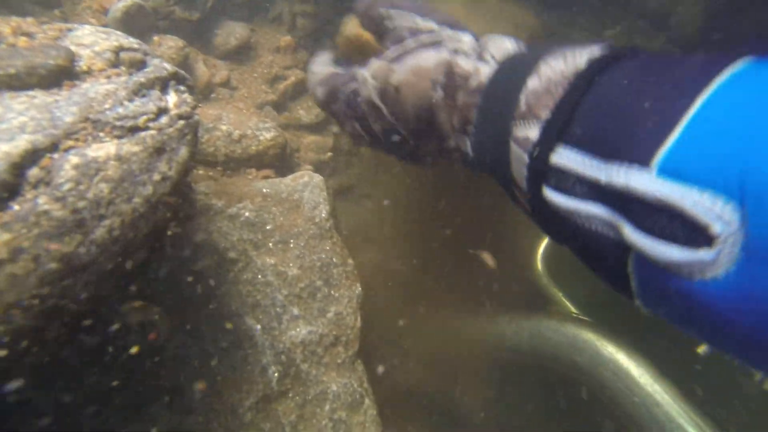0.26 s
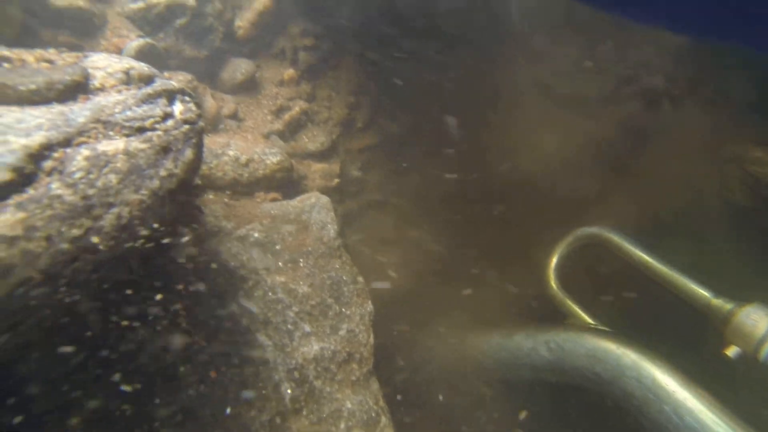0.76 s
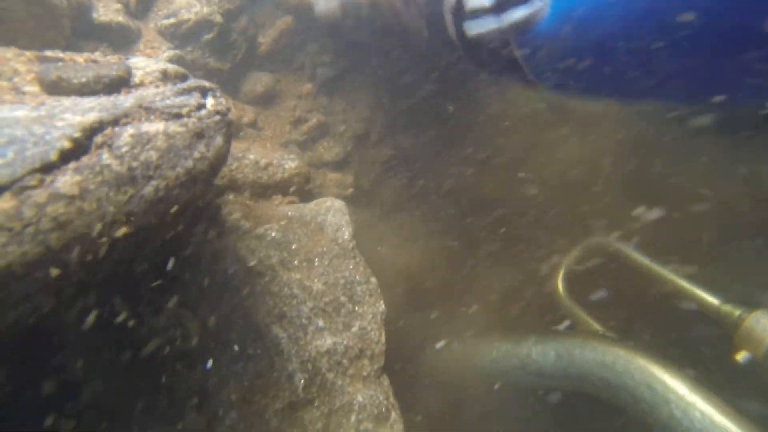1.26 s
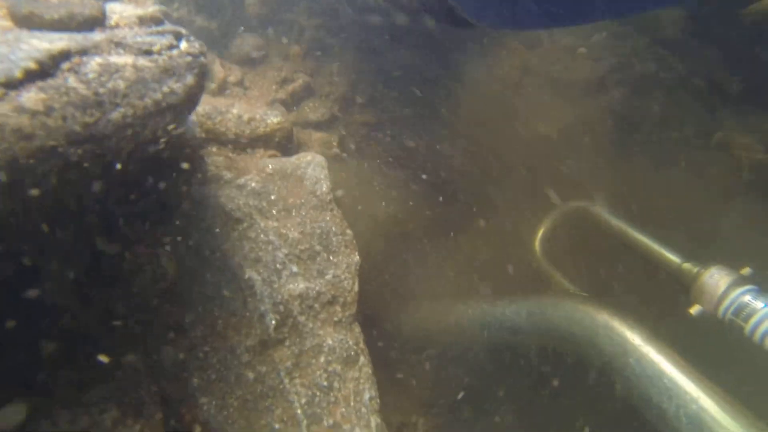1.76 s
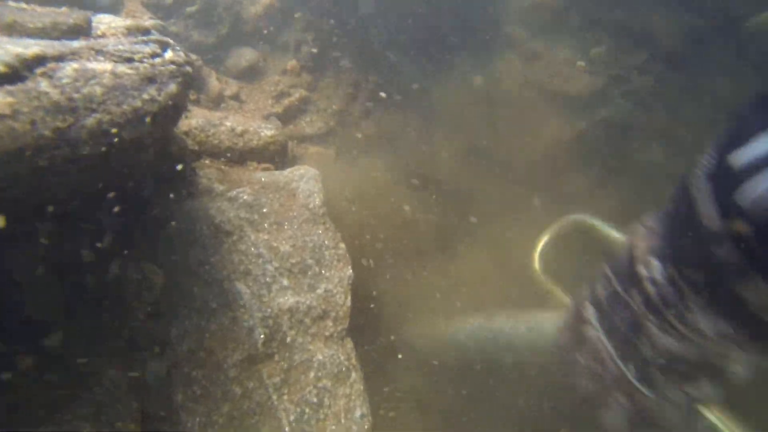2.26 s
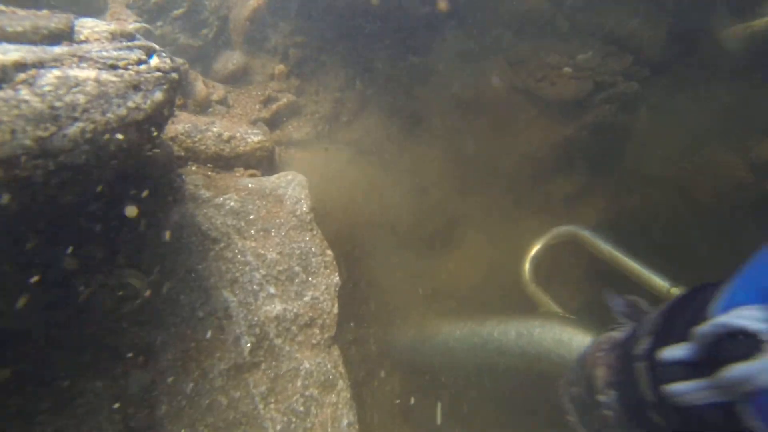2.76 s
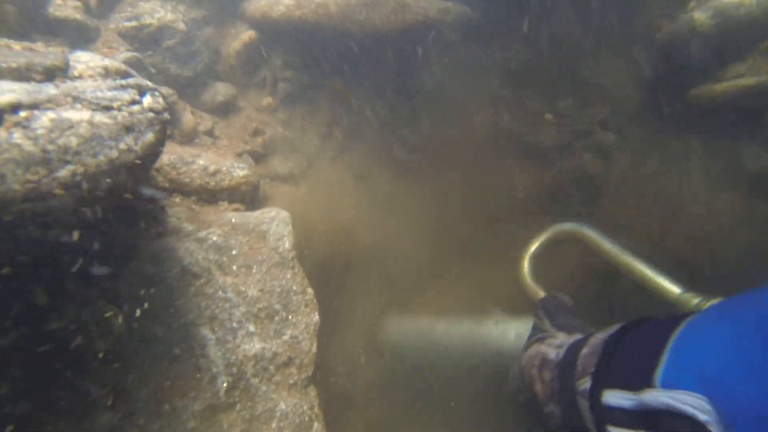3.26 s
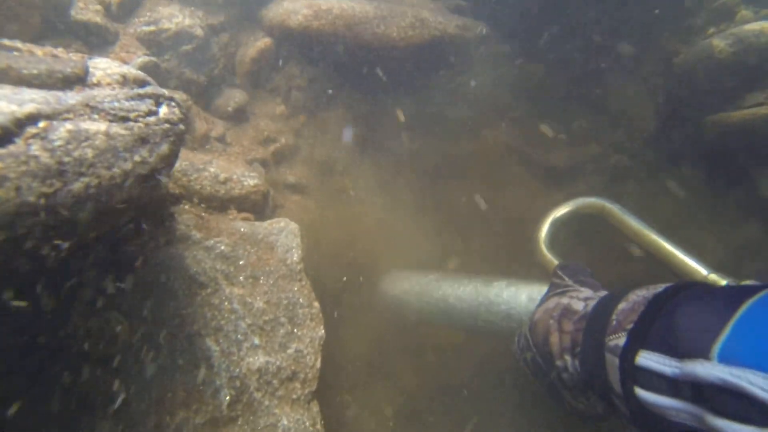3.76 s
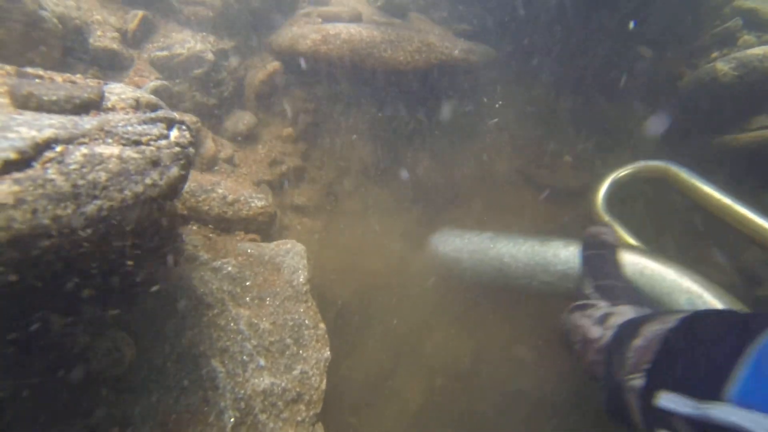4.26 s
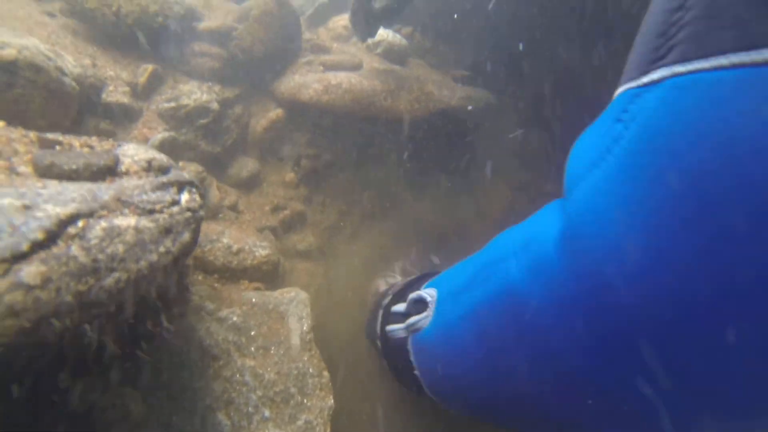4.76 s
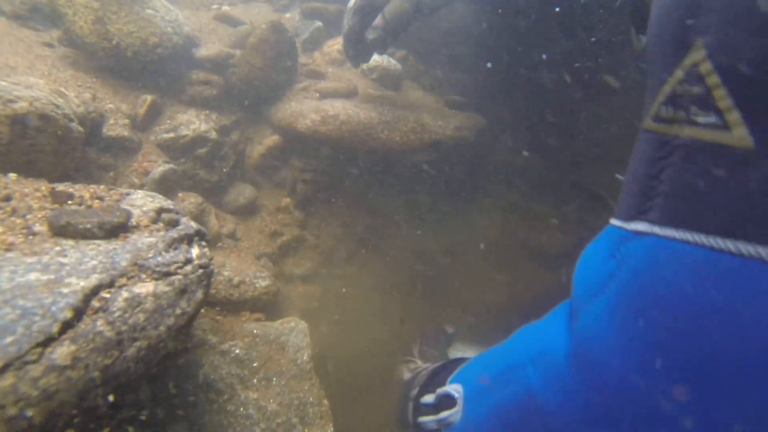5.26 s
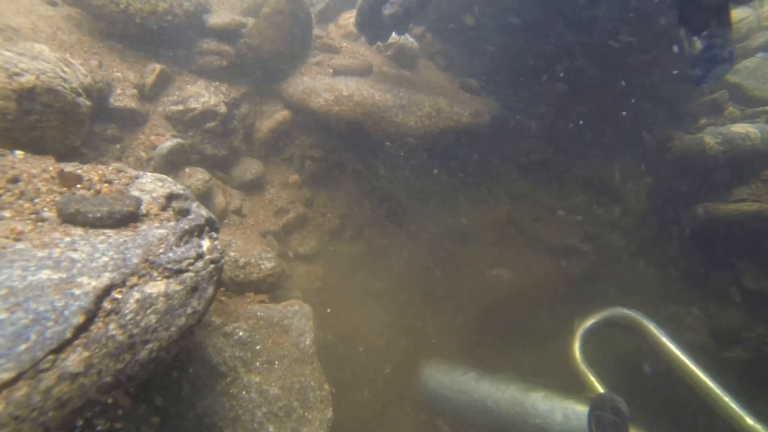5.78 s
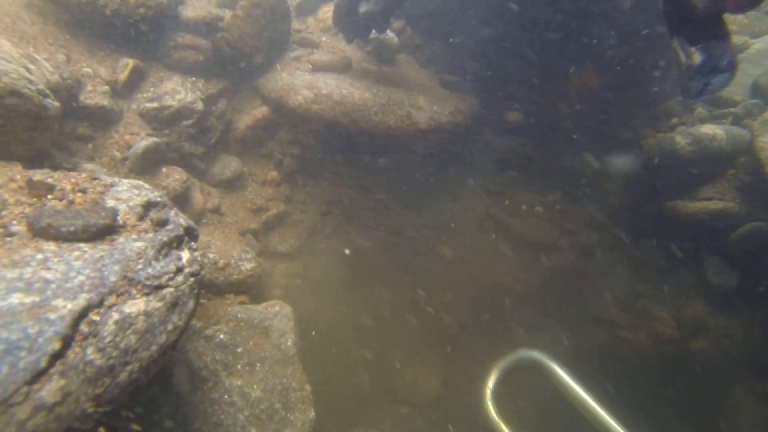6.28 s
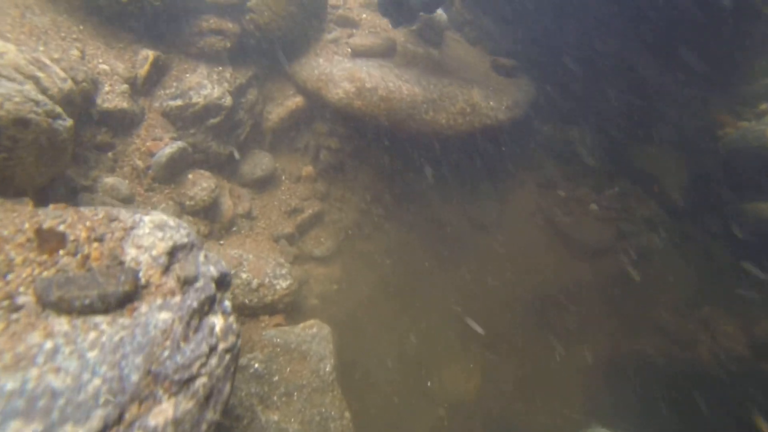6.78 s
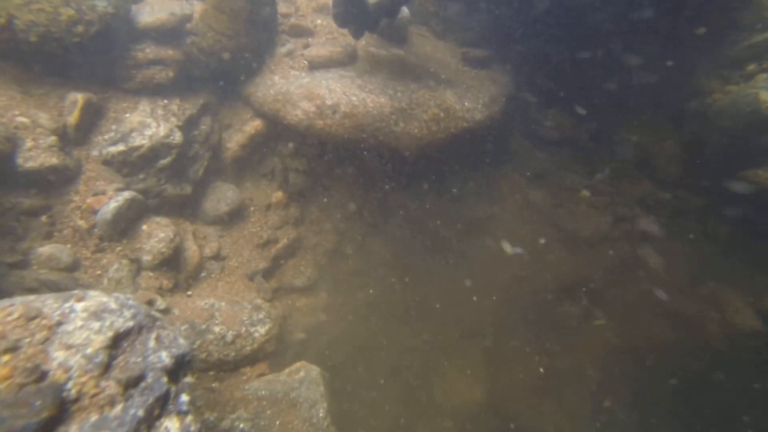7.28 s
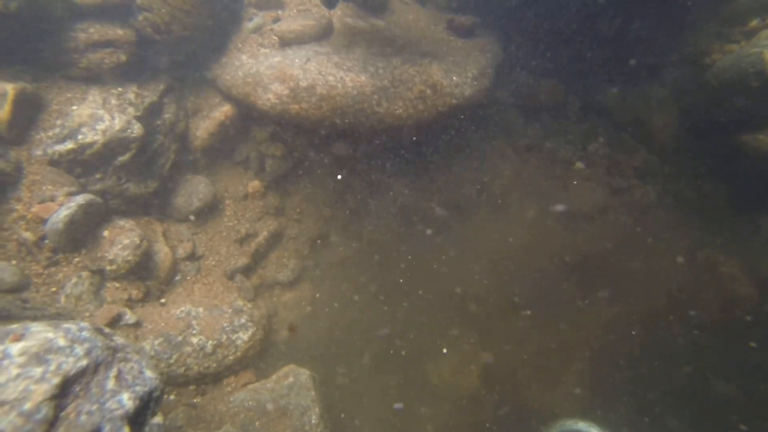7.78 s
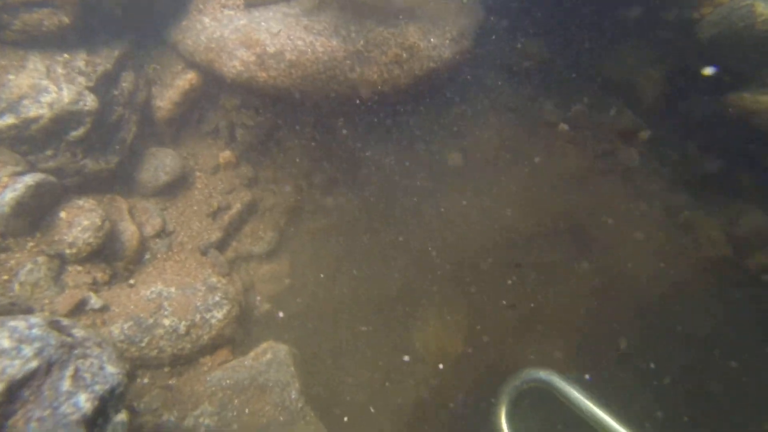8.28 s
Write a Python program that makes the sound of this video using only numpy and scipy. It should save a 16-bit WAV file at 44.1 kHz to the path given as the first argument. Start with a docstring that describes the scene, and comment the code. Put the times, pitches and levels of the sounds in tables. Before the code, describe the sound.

A suction dredge works on a creek bed, heard through a camera housing under water. Stones snap and clack up the steel nozzle in a busy start, thin out, then return as frequent knocks through the middle. After a stuttering rubber rub the stone hits pause, leaving hissing gravel and beating motor hum, before a last handful of sharp cracks. Low water buffets throughout.

```python
"""Creek bed, heard by a camera under water beside a suction dredge.
Gravel rushes up the nozzle as dense random impacts through its resonances; sand, pebbles and stones stand out.
Plinks and knocks are short rings, the glove a train of slips, pump and engine sums of harmonics.
Filtered noise makes the water. Gain control ducks after hard hits, then recovers.
"""
import sys
import numpy as np
from scipy import signal
from scipy.fft import rfft, irfft
from scipy.io import wavfile
from scipy.ndimage import uniform_filter1d, minimum_filter1d, map_coordinates

SR = 44100
rng = np.random.default_rng(int(sys.argv[2]) if len(sys.argv) > 2 else 0)


def materialize(psi):
    """Save the field psi as 16-bit PCM at rate SR to the path in sys.argv[1].

    A 1-D psi becomes a single channel; in a 2-D psi each row is a channel.
    """
    bounded = np.clip(np.atleast_2d(psi).T, -1, 1)
    quanta = np.round(bounded * 32767).astype(np.int16)
    wavfile.write(sys.argv[1], SR, quanta)


N = 376173

# Peaks and notches of the camera housing: (centre [Hz], full width at half the dB gain [Hz], gain [dB])
HOUSING_BELLS = [(570, 110, 7.5), (940, 49, 9.5), (1574, 310, 9), (1900, 96, -5.5), (2204, 100, 3.5),
                 (2328, 130, -8.5), (2785, 165, -8), (3020, 116, -5), (3334, 136, 9), (3772, 240, -16),
                 (4400, 630, 3.5), (4970, 103, -15), (5295, 340, 4.5), (7270, 230, 5), (7920, 1300, -4),
                 (9360, 170, 7), (9735, 630, -9.5)]
# Nozzle resonances by position: (start [s], [(centre [Hz], full width at half the dB gain [Hz], gain [dB])])
NOZZLE_POSES = [(0, [(880, 260, 7), (1540, 360, 4.5), (3360, 220, -2), (10900, 11000, 6)]),
                (2.2, [(1500, 1700, 4.5), (2725, 220, 6.5), (3250, 250, -8), (5530, 1500, 2.5),
                (11700, 3100, 4.5)]), (3.2, [(1030, 570, 4.5), (2210, 220, 4), (3420, 170, -9),
                (4420, 260, 5.5), (12000, 3200, -4)]), (4.35, [(570, 47, 9.5), (895, 160, -4),
                (1410, 280, 9.5), (2610, 600, -11), (3220, 330, 1), (4100, 600, 1.5), (5000, 280, -7),
                (5430, 230, 4), (5730, 400, -9), (6500, 560, 2), (8600, 1000, 4.5)]), (4.98, [(570, 47, 5),
                (910, 190, -5.5), (1470, 300, 7), (2660, 580, -11), (3300, 150, -4.5), (4500, 440, 5),
                (5400, 230, 1), (5900, 400, -2), (6900, 980, 9), (8800, 1000, 4.5)]),
                (5.6, [(1280, 700, -1.5), (3070, 79, 6.5), (4400, 370, 5.5), (8800, 600, 3)]),
                (6.75, [(1167, 89, 9), (1454, 240, -14), (2355, 270, -11.5), (2820, 330, 10.5),
                (3360, 140, -11.5), (4540, 320, -3), (6300, 170, 8), (12700, 4800, 6.5)]),
                (7.65, [(1170, 110, 15), (1360, 570, -10), (2850, 410, 6), (3380, 220, -13),
                (6550, 1500, 3.5), (12400, 9500, 7)])]


def amp(db):
    """Decibels to amplitude factor."""
    return 10 ** (np.asarray(db) / 20)


def unit(x):
    """Scale to an rms of 1."""
    return x / np.sqrt(np.mean(x ** 2) + 1e-20)


def crest(x):
    """Scale to a peak of 1."""
    return x / (np.abs(x).max() + 1e-12)


def curve(rows):
    """Interpolate (time [s], value) rows to one value per sample."""
    s, values = np.transpose(rows)
    return np.interp(np.arange(N) / SR, s, values)


def wobble(knots_per_s):
    """Smooth random curve through normally distributed knots."""
    knots = rng.standard_normal(int(N * knots_per_s / SR) + 4)
    return map_coordinates(knots, [np.arange(N) * knots_per_s / SR])


def colour(points, bells=(), size=4096):
    """Minimum-phase impulse response of a broad spectrum with peaks and notches on it."""
    hz = np.fft.rfftfreq(size, 1 / SR)
    point_hz, level_db = np.transpose(points)
    db = np.interp(np.log(hz + 1), np.log(point_hz), level_db)
    for centre_hz, width_hz, gain_db in bells:
        db = db + gain_db * .5 ** ((2 * (hz - centre_hz) / width_hz) ** 2)
    # Folding the cepstrum onto positive time makes the response causal
    cepstrum = irfft(np.log(amp(db)))
    cepstrum[1:size // 2] *= 2
    cepstrum[size // 2 + 1:] = 0
    return irfft(np.exp(rfft(cepstrum)))


def through(x, response):
    """Convolve, keeping the input length."""
    return signal.oaconvolve(x, response)[:len(x)]


def passed(x, hz, kind, order=2):
    """Butterworth filter."""
    return signal.sosfilt(signal.butter(order, hz, kind, fs=SR, output="sos"), x)


def add(track, s, sound):
    """Mix a sound into the track from time s, in place."""
    part = track[max(round(s * SR), 0):][:len(sound)]
    part += sound[:len(part)]


def grains(rate_per_s, spread_db):
    """Random impacts of either sign, log-normal in size within two deviations, rms 1."""
    hit = rng.random(N) < rate_per_s / SR
    size_db = spread_db * np.clip(rng.standard_normal(N), -2, 2)
    return unit(hit * rng.choice([-1, 1], N) * amp(size_db))


def swells(rows, steady_db):
    """One gain per level column: a steady level plus, in power, a smooth rise and fall for each event."""
    t = np.arange(N) / SR
    power = amp(steady_db)[:, None] ** 2
    for s, length_s, *db in rows:
        shape = np.cos(np.pi * np.clip((t - s) / length_s, -.5, .5))
        power = power + (amp(db)[:, None] * shape) ** 2
    return np.sqrt(power)


def pose_at(s):
    """Index of the nozzle position at time s."""
    return np.searchsorted([start_s for start_s, _ in NOZZLE_POSES[1:]], s)


def lifted():
    """0 before the camera lifts away from the nozzle, 1 after."""
    lift_s, lift_takes_s = 6.68, .2
    return np.clip((np.arange(N) / SR - lift_s) / lift_takes_s + .5, 0, 1)


def off_rock(x, delay_s, drift, share):
    """A reflection from nearby rock; its path drifts, so faint peaks wander through the hiss."""
    lag = delay_s * SR * (1 + drift * wobble(1.645))
    echo = map_coordinates(x, [np.arange(N) - lag], order=3)
    return unit(x + share * echo)


def gravel():
    """Dense impacts in clumps ring the nozzle, whose colour shifts as it is moved."""
    # How much gravel the nozzle draws: (time [s], level [dB])
    stream_levels = [(0, -29.5), (.3, -34.5), (.52, -39), (.8, -31), (1.25, -36.5), (1.6, -28.5),
                     (2.2, -35), (2.75, -26), (3.25, -32), (3.7, -27), (4.3, -30.5), (4.7, -27.5),
                     (6.05, -36.5), (6.4, -28.5), (6.8, -35), (7.25, -32), (7.8, -32), (8.53, -33.5)]
    # Broad colour: (frequency [Hz], relative density [dB per Hz])
    gravel_spectrum = [(100, -37), (350, -13), (600, -13), (1100, -6.5), (1600, -3.5), (2400, 5.5),
                       (3300, 0), (4500, -7.5), (6000, -12), (9000, -13.5), (12500, -26.5), (15000, -37)]
    impacts = grains(rate_per_s=2600, spread_db=3.5) + 1.27 * rng.standard_normal(N)
    impacts = impacts * amp(1.4 * wobble(170) + 1.47 * wobble(25))
    pose = pose_at(np.arange(N) / SR)
    rush = np.zeros(N)
    for k, (_, bells) in enumerate(NOZZLE_POSES):
        # Quarter-second crossfade between positions
        share = np.abs(uniform_filter1d((pose == k) * 1., size=SR // 4))
        rush += np.sqrt(share) * unit(through(impacts, colour(gravel_spectrum, HOUSING_BELLS + bells)))
    return off_rock(rush, delay_s=0.000882, drift=0.12, share=0.26) * amp(curve(stream_levels))


def crackle():
    """Bright sand ticks and duller pebbles stand out of the stream, each a short decaying scrape of noise."""
    # Loose grit: (time of the thickest part [s], length [s], sand level [dB], pebble level [dB])
    grit_gulps = [(.36, 0.53, -29.5, -33.5), (2.1, 0.51, -41, -33.5), (3.35, 0.85, -52, -45),
                  (5.65, 0.87, -56, -35.5), (7.8, 0.35, -42, -33), (8.3, 1, -42.5, -41.5)]
    # Colours: (frequency [Hz], relative density [dB per Hz])
    sand_spectrum = [(200, -9), (1400, -18), (3300, 1), (7000, 2), (11000, -2), (13000, -1), (15500, -27)]
    pebble_spectrum = [(200, -14), (900, -15.5), (2200, 5.5), (3300, -11), (4400, -4.5), (6000, -19),
                       (9000, -20), (12500, -43), (15500, -71)]
    trickle_sand_db, trickle_pebble_db = -57, -55.5
    sand_gain, pebble_gain = swells(grit_gulps, [trickle_sand_db, trickle_pebble_db])
    t = np.arange(SR // 50) / SR

    def scrapes(hits, spectrum, t60_s):
        """Decaying noise after each hit, coloured, rms 1."""
        burst = through(np.abs(hits), amp(-60 * t / t60_s)) * rng.standard_normal(N)
        return unit(through(burst, colour(spectrum, HOUSING_BELLS)))

    sand = scrapes(grains(rate_per_s=100, spread_db=7.0), sand_spectrum, t60_s=0.0076)
    pebbles = scrapes(grains(rate_per_s=110, spread_db=3.5), pebble_spectrum, t60_s=.01)
    return sand_gain * sand + pebble_gain * pebbles


def stones():
    """Each stone cracks for a few milliseconds on the water-damped steel, coloured by the nozzle's position."""
    # Hits, levels before the offsets below: (time [s], peak [dB], knock [dB], snap [dB])
    stone_hits = [(0.127, -16.5, -19, -9), (0.2177, -11, -19.5, -14.5), (0.239, -20, -18, -17),
                  (0.249, -12, -16, -11), (0.3205, -15, -8, -4), (0.2952, -25, -16, -7),
                  (0.383, -12, -7, -2), (0.3943, -21, 1, -15), (0.4336, -7, -7, -5), (0.4595, -18, -18, -5),
                  (0.5211, -8, -14, -8), (0.5997, -19, -6, -6), (1.078, -13.5, -2, -12.5),
                  (1.2397, -16.5, 6.5, 5), (1.6834, -9.5, -10.5, -6.5), (2.0057, -11.5, -14.5, -22),
                  (2.0296, -5.5, -17, -10), (2.165, -13.5, -15, -14), (2.1758, -17, -14, -20),
                  (2.2425, -6.5, -8, -6.5), (3.046, -22, 5, -28), (3.1738, -14.5, -2, -14),
                  (3.209, -12, -18, -30), (3.46, -3, -19, -21.5), (3.573, -8, -19, -30),
                  (3.6166, -10.5, -18, -30), (3.6238, -8, -11, -18), (3.7624, -8.5, -16.5, -38),
                  (3.892, -17, -17, -30), (3.902, -9.5, -19.5, -26), (3.9118, -5.5, -19, -25),
                  (4.0315, -10, -10, -15), (4.126, -14.5, -14, -38), (4.156, -8.5, -24, -25),
                  (4.3066, -14, -19, -40), (4.344, -6, -23.5, -32), (4.5529, -13, -9, -39),
                  (4.7671, -10.5, -24, -37), (4.7827, -8, -35, -34), (4.9195, -5.5, -22, -28),
                  (5.232, -12.5, -37, -21.5), (5.2565, -12.5, -22, -30), (5.3543, -16, -20, -33),
                  (5.437, -12, -23.5, -26.5), (5.57, -20, -13, -40), (5.5879, -12.5, -18, -41),
                  (5.6284, -15.5, -9, -28), (5.7446, -14.5, -14, -17.5), (5.8398, -4.5, -21.5, -17),
                  (7.5268, -16.5, -18, -9.5), (7.716, -10.5, -11, -8), (7.7563, -19, -29, -9),
                  (7.7988, -8, -7, 0), (7.8245, -6.5, -11, -5), (7.8855, -8, -15.5, -8.5),
                  (8.4237, -21, -12, -7)]
    # Steel nozzle under a stone: (frequency [Hz], relative density [dB per Hz])
    steel_spectrum = [(200, -20.5), (900, -10.5), (1500, -7), (2200, 8.5), (3000, -0.5), (4400, 0.5),
                      (5300, -10), (6300, -13.5), (9000, -25.5), (12500, -34), (15500, -56)]
    pose_share = 0.68  # part of the position's dB gains that a stone takes on
    out, t = np.zeros(N), np.arange(SR // 30) / SR
    bodies = []
    for _, bells in NOZZLE_POSES:
        softened = [(hz, width_hz, pose_share * db) for hz, width_hz, db in bells]
        bodies.append(colour(steel_spectrum, HOUSING_BELLS + softened))
    for s, db, knock_db, snap_db in stone_hits:
        contact = np.exp(-(t / .0021) ** 2) + .07 * amp(-60 * t / .025)
        crack = through(contact * rng.standard_normal(len(t)), bodies[pose_at(s)])
        knock = amp(knock_db + 12.5) * crest(passed(crack, 2760, "low", order=4))
        ring = amp(-3.5) * crest(passed(crack, [2800, 6000], "band"))
        snap = amp(snap_db + 7) * crest(passed(crack, 7450, "high", order=6))
        add(out, s - .0003, amp(db + 2.5) * crest(knock + ring + snap))
    return out


def plinks():
    """Plinks and short rings of the nozzle: decaying sines with a soft onset."""
    # (time [s], peak [dB], pitch [Hz], t60 [s])
    nozzle_rings = [(1.239, -13, 1385, 0.018), (1.268, -18, 1390, .022), (3.043, -17.5, 1575, 0.035),
                    (4.554, -31, 570, 0.15), (4.783, -27.5, 570, 0.12), (4.922, -30.5, 570, 0.065),
                    (5.438, -30.5, 580, 0.06), (7.886, -12.5, 2250, 0.051)]
    out, t = np.zeros(N), np.arange(SR // 16) / SR
    for s, db, hz, t60_s in nozzle_rings:
        ring = np.sin(2 * np.pi * hz * t) * amp(-60 * t / t60_s) * (1 - np.exp(-t / 0.0014))
        add(out, s, amp(db) * crest(ring))
    return out


def knocks():
    """Soft, dull knocks on the housing: one push and the brief ring of its modes."""
    # (time [s], peak [dB])
    housing_hits = [(1.167, -27), (1.239, -15.5), (1.27, -22), (1.815, -6), (1.843, -18.5), (1.9030, -5.5)]
    # Housing modes: (frequency [Hz], mean relative level [dB], t60 [s])
    thud_modes = [(108, -17, 0.13), (209, -13, 0.0067), (396, -1, 0.03), (608, 2, 0.027), (940, -2, 0.016),
                  (1500, 7.5, 0.0057), (1837, -7, 0.019)]
    out, t = np.zeros(N), np.arange(SR // 16) / SR
    push = np.exp(-((t - .0013) / 0.00031) ** 2)
    for s, db in housing_hits:
        ring = np.zeros(len(t))
        for hz, level_db, t60_s in thud_modes:
            mode_db = level_db + rng.normal(0, 2.8)
            ring += amp(mode_db - 60 * t / t60_s) * np.sin(2 * np.pi * hz * t)
        ring = crest(ring * (1 - np.exp(-t / 0.00072)))
        add(out, s, amp(db) * crest(push + 0.66 * ring))
    return out


def glove():
    """Rubber sticks and slips unevenly, mostly ever faster; in each slip the lowest rings start last."""
    # Rubs, rates before the unsteadiness:
    # (start [s], length [s], first rate [slips/s], last rate [slips/s], relative level [dB])
    glove_rubs = [(5.862, 0.024, 80, 85, -10), (5.91, .006, 100, 100, -9), (5.923, 0.028, 104.5, 300, -6),
                  (5.953, 0.047, 330, 480, -15.5), (6.043, .038, 120, 220, -19.5),
                  (6.1, .006, 100, 100, -25.5), (6.124, 0.024, 105, 310, -23)]
    # Ring of one slip: (frequency [Hz], relative level [dB], t60 [s], delay [s])
    slip_modes = [(1900, -7, 0.0091, 0.0001), (964, 6, 0.013, 0.00082), (685, -3, 0.012, 0.00028),
                  (513, -1, 0.023, 0.00288), (354, -14, 0.031, 0.0044)]
    slips, t = np.zeros(N), np.arange(SR // 30) / SR
    unsteady = amp(1.81 * wobble(160))
    for s, length_s, first, last, db in glove_rubs:
        start = round(s * SR)
        rate = np.linspace(first, last, max(int(length_s * SR), 2))
        rate = rate * unsteady[start:][:len(rate)]
        # A slip at each whole cycle of the summed rate
        at = np.flatnonzero(np.diff(np.floor(np.cumsum(rate) / SR), prepend=-1))
        slip_db = db + 2 * rng.standard_normal(len(at))
        slips[start + at] = amp(slip_db) * np.sqrt(first / rate[at])  # faster slips are weaker
    ring = np.zeros(len(t))
    for hz, db, t60_s, delay_s in slip_modes:
        mode = amp(db - 60 * t / t60_s) * np.sin(2 * np.pi * hz * t)
        add(ring, delay_s, mode * (1 - np.exp(-t / 0.00047)))
    return through(slips, crest(ring))


def machines():
    """Pump and engine run at slightly different speeds and beat; the pump's fourth line is the hum."""
    # How well the machines carry to the camera: (time [s], gain [dB])
    carry_levels = [(0, -9.5), (2, -14), (4, -8.5), (5.2, -3), (6.3, 0), (7.4, 2), (8.53, 1)]
    # Hum before the lift's cut: (time [s], level [dB])
    hum_levels = [(0, -39), (1.4, -44.5), (2.5, -36.5), (3.6, -34.5), (5.5, -41), (8.53, -38.5)]
    # Lines before the carry gain: (multiple of the cycle rate, rms level [dB])
    pump_lines = [(2, -65), (8, -60), (10, -52.5), (14, -61), (16, -62), (18, -65.5), (20, -54.5),
                  (22, -57), (24, -56.5), (26, -60)]
    engine_lines = [(3, -66), (4, -75.5), (5, -55), (6, -50.5), (7, -58.5), (8, -62), (9, -56), (10, -55),
                    (11, -68), (13, -65), (15, -65.5)]
    lift_hum_db = -8.5

    def turn(mean_cycle_hz):
        """Phase [rad] of a slightly unsteady cycle."""
        return 2 * np.pi * np.cumsum(mean_cycle_hz * (1 + .0012 * wobble(3.22))) / SR

    def lines(phase, orders):
        """Sum of harmonics at random starting phases."""
        total = np.zeros(N)
        for k, db in orders:
            total += amp(db) * np.sqrt(2) * np.sin(round(k) * phase + 2 * np.pi * rng.random())
        return total

    pump, engine = turn(28.3), turn(27.03)
    flutter = amp(0.51 * wobble(22))
    hum = unit(flutter * lines(pump + 0.039 * wobble(47), [(4, 0)]))
    hum = hum * amp(curve(hum_levels) + lift_hum_db * lifted())
    return hum + amp(curve(carry_levels)) * (lines(pump, pump_lines) + lines(engine, engine_lines))


def water():
    """Current sways and buffets the housing, churns round each arm stroke and at times gives a slow push."""
    # Arm strokes: (time of the fastest part [s], length [s], buffeting level [dB], churning level [dB])
    arm_strokes = [(.15, 0.53, -45, -53), (.87, 0.39, -28.5, -38), (1.1, 0.52, -31.5, -50),
                   (1.68, 1, -46, -38), (2.87, 0.56, -35.5, -46), (4.72, 0.26, -35.5, -44.5),
                   (5.718, 0.056, -42, -31), (5.93, 0.22, -28, -32.5)]
    # Slow pushes on the housing: (time [s], peak [dB])
    surge_pushes = [(0.259, -9.5), (0.999, -10.5), (1.703, -12), (2.042, -14), (6.655, -8), (6.79, -7.5),
                    (7.542, -2.5)]
    # Colours: (frequency [Hz], relative density [dB per Hz])
    sway_spectrum = [(6, -9), (16, 6), (30, -10), (55, -24.5), (120, -35.5), (600, -107)]
    buffet_spectrum = [(10, -24), (35, 6.5), (55, 1.5), (85, -2), (130, -13.5), (220, -28), (600, -57),
                       (2000, -107)]
    churn_spectrum = [(40, -23), (130, 0), (300, -9), (700, 6.5), (1000, -1.5), (1600, -0.5), (5000, -88)]
    current_buffet_db, current_churn_db = -37.5, -52.5  # between strokes, before the lift
    sway_before_lift_db, lift_sway_db, lift_buffet_db = -27.5, 7, -10
    t = np.arange(N) / SR
    buffet_gain, churn_gain = swells(arm_strokes, [current_buffet_db, current_churn_db])
    sway = unit(through(rng.standard_normal(N), colour(sway_spectrum, size=16384)))
    sway = sway * amp(sway_before_lift_db + lift_sway_db * lifted())
    buffet = unit(through(rng.standard_normal(N), colour(buffet_spectrum)))
    buffet = buffet * buffet_gain * amp(lift_buffet_db * lifted())
    churn = unit(through(grains(rate_per_s=660, spread_db=8.5), colour(churn_spectrum)))
    churn = churn * churn_gain * amp(3.0 * wobble(30))
    surges = sum(amp(db) * np.exp(-((t - s) / .014) ** 2) for s, db in surge_pushes)
    return sway + buffet + churn + surges


def scene():
    """Sum of all sources, one channel."""
    return (gravel() + crackle() + stones() + plinks() + knocks() + glove() + machines() + water())[None]


def gain_control(x, threshold_db, slope, release_db_per_s):
    """Peaks pull the gain down just after they pass; it holds, then recovers at a steady dB rate."""
    over_db = slope * np.maximum(20 * np.log10(np.abs(x) + 1e-9) - threshold_db, 0)
    hold, lag = SR // 32, SR // 300  # samples
    held_db = -minimum_filter1d(-over_db, hold, origin=(hold - 1) // 2)
    ramp_db = release_db_per_s * np.arange(N) / SR
    cut_db = np.maximum.accumulate(held_db + ramp_db) - ramp_db
    late_cut_db = np.pad(cut_db, (lag, 0))[:N]
    return x * amp(-uniform_filter1d(late_cut_db, lag))


def record(dry):
    """Gain control, a low cut, soft clipping and the camera's band limit."""
    top_hz = 15400
    x = gain_control(dry[0], threshold_db=-11.5, slope=1.4, release_db_per_s=62)
    x = passed(x, 27, "high")
    x = x / (1 + np.abs(x / .92) ** 6) ** (1 / 6)
    in_band = np.fft.rfftfreq(N, 1 / SR) < top_hz
    return irfft(rfft(x) * in_band, N)[None]


dry = scene()
out = record(dry)
materialize(out)
```